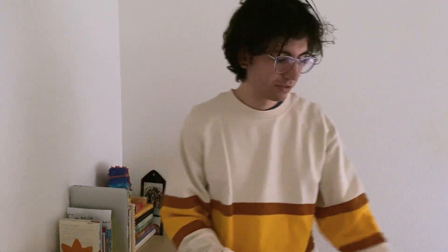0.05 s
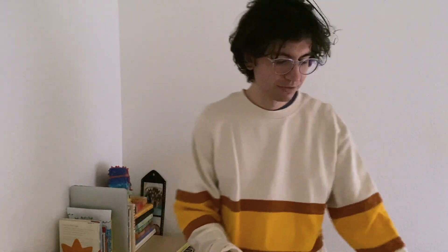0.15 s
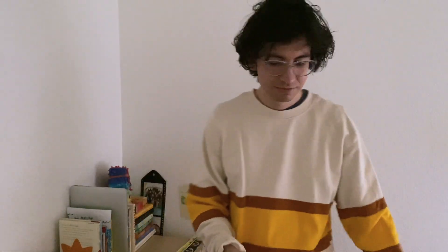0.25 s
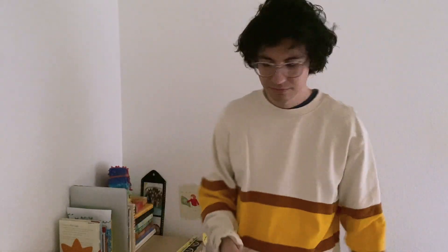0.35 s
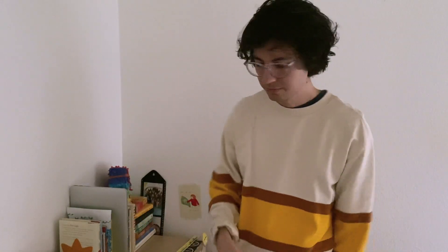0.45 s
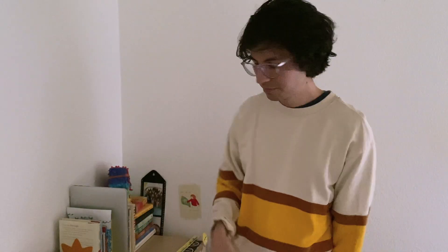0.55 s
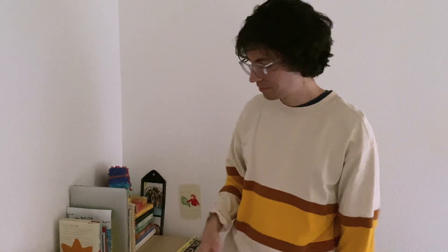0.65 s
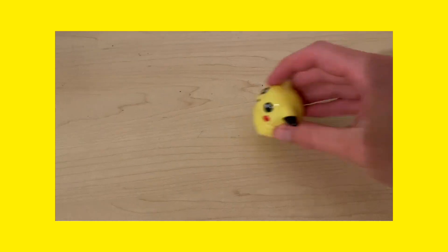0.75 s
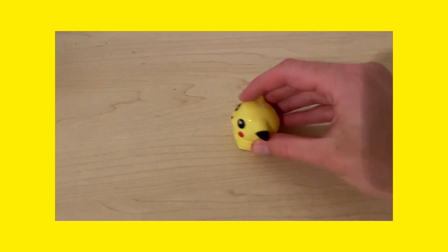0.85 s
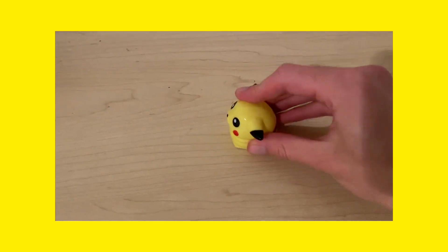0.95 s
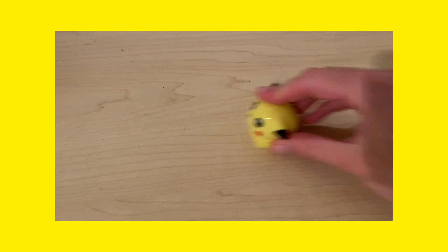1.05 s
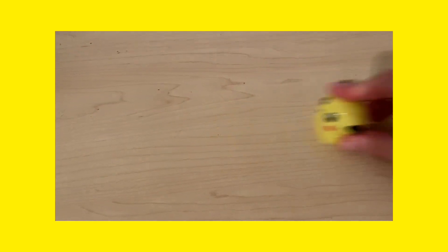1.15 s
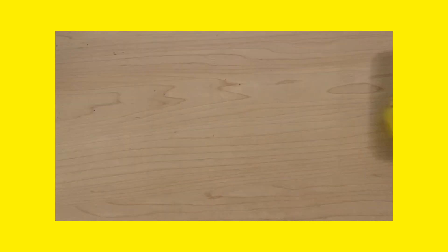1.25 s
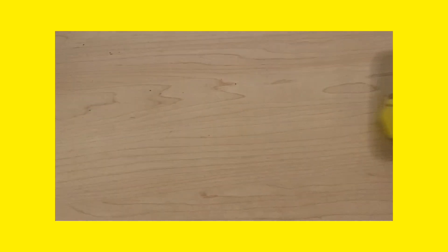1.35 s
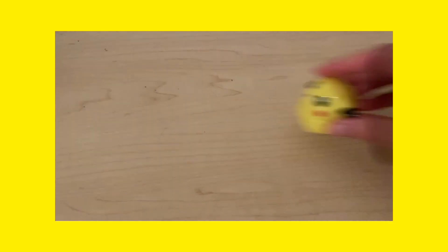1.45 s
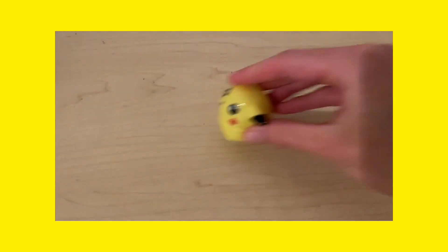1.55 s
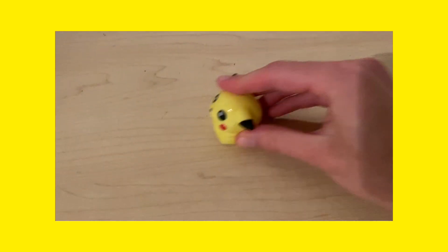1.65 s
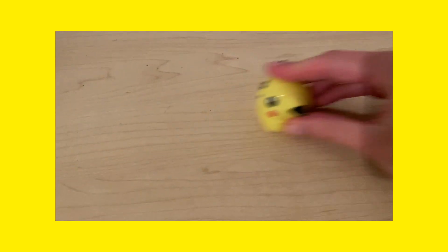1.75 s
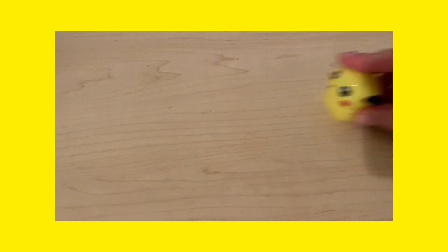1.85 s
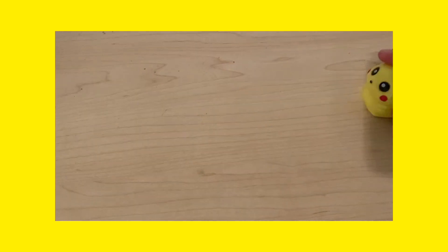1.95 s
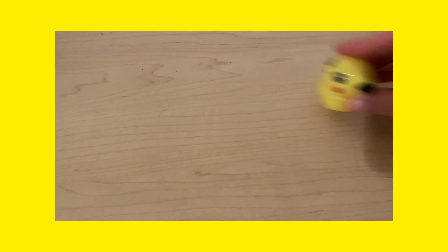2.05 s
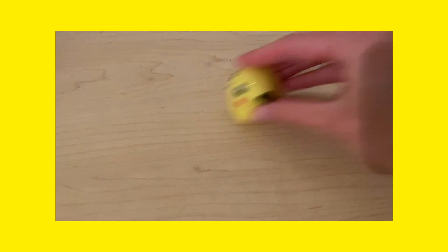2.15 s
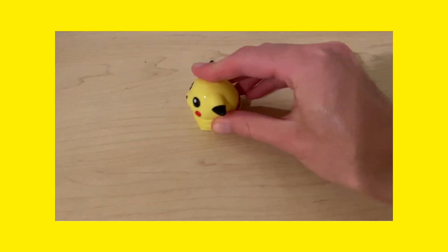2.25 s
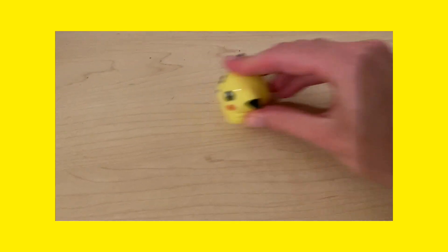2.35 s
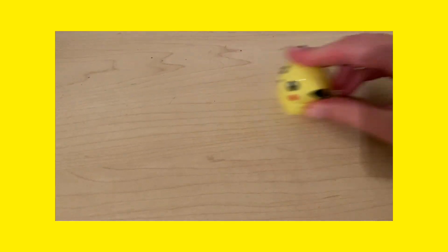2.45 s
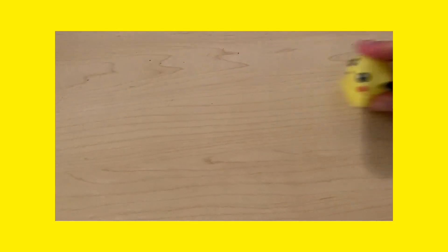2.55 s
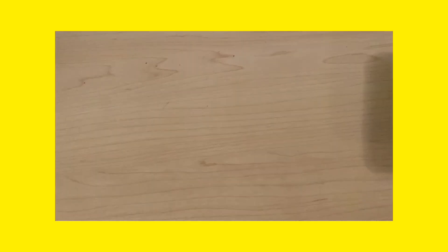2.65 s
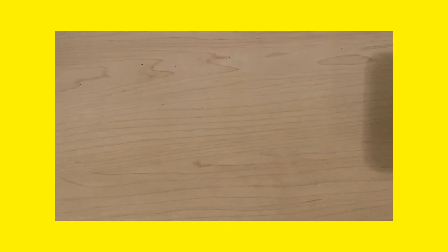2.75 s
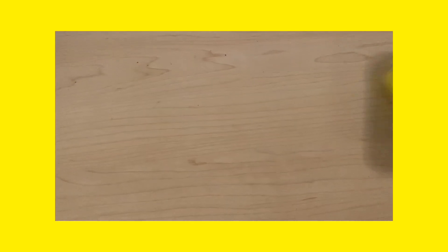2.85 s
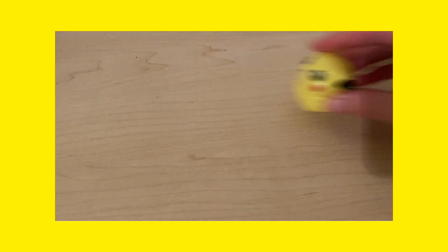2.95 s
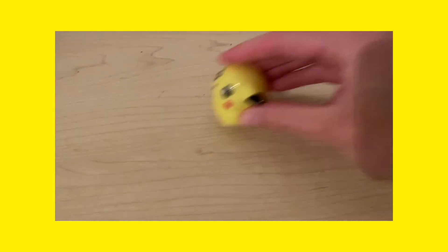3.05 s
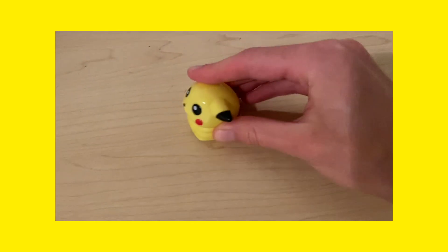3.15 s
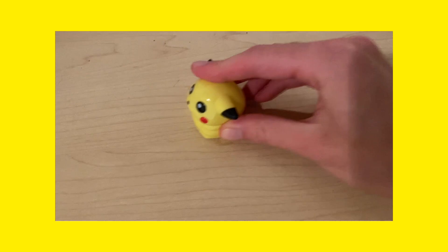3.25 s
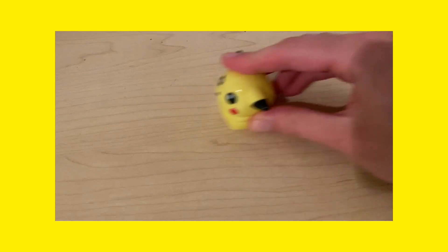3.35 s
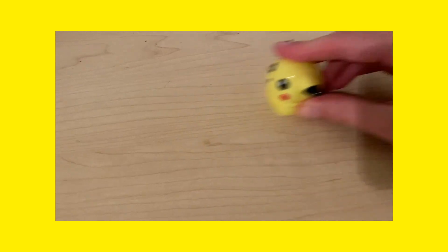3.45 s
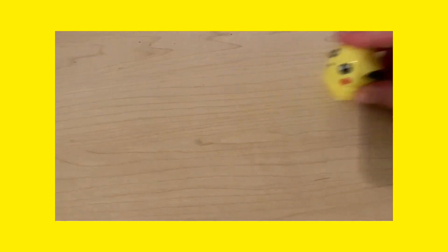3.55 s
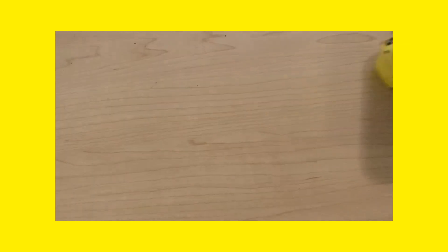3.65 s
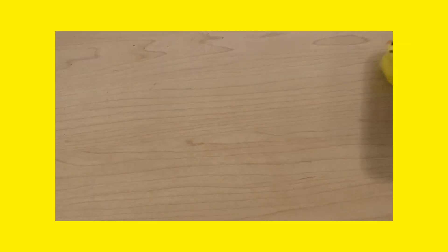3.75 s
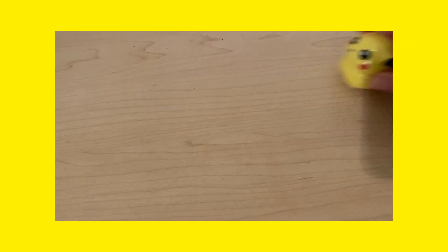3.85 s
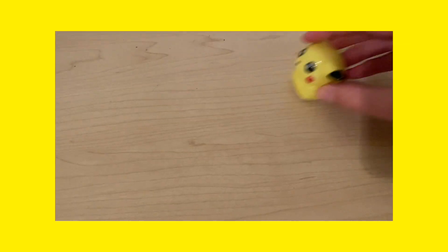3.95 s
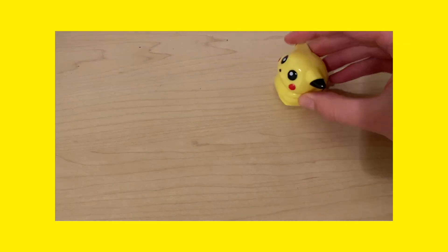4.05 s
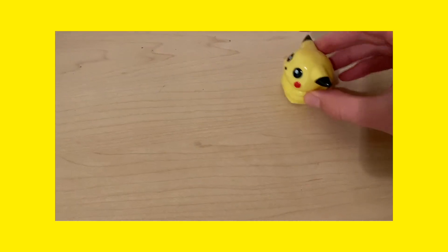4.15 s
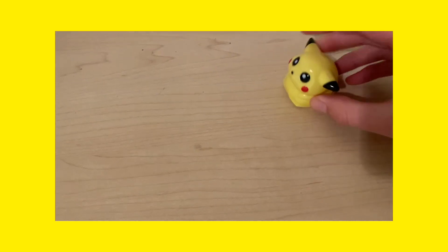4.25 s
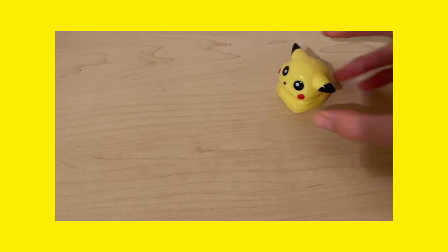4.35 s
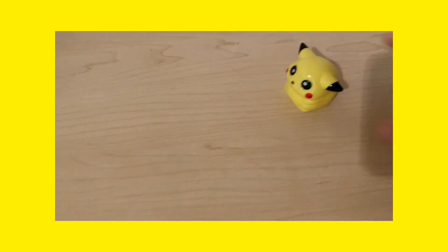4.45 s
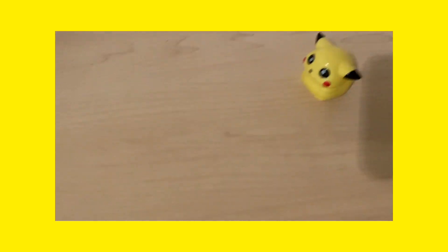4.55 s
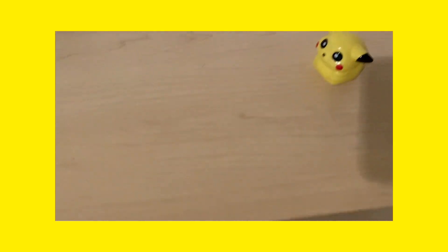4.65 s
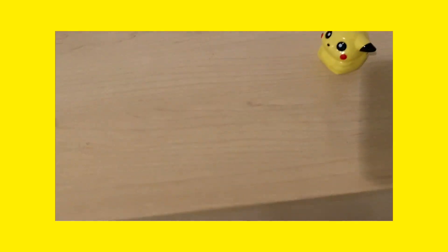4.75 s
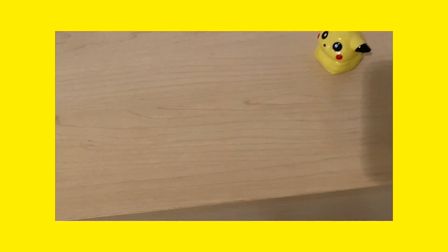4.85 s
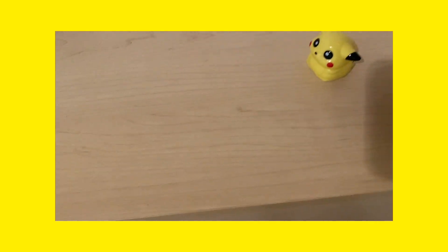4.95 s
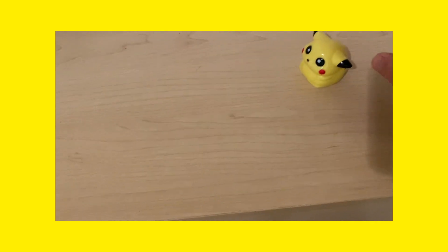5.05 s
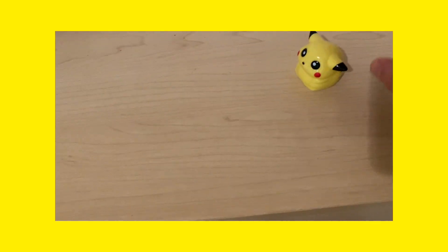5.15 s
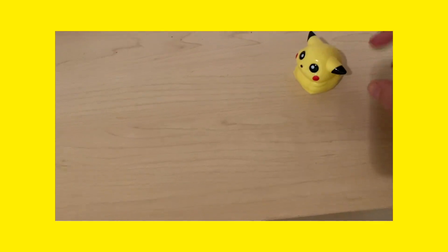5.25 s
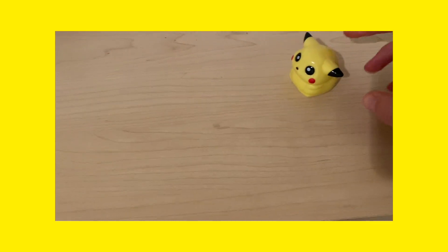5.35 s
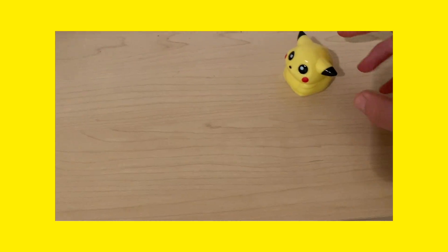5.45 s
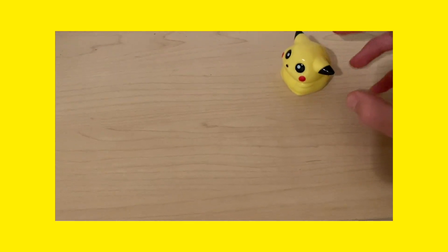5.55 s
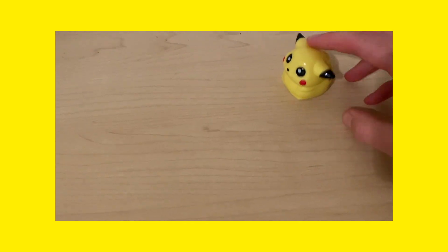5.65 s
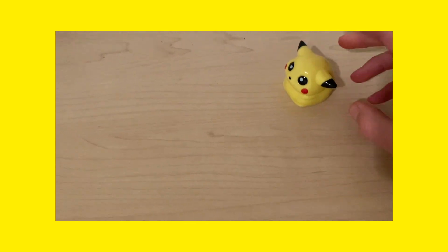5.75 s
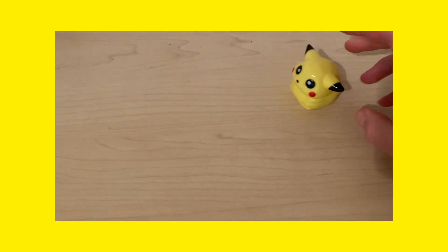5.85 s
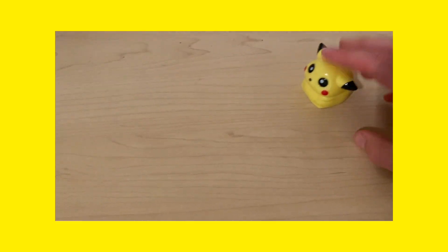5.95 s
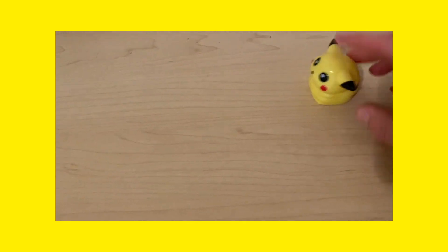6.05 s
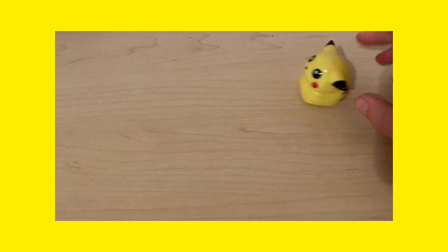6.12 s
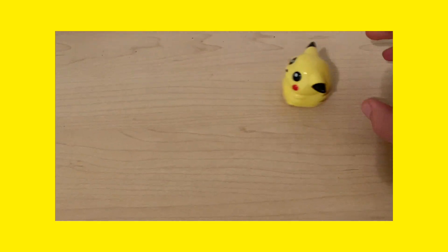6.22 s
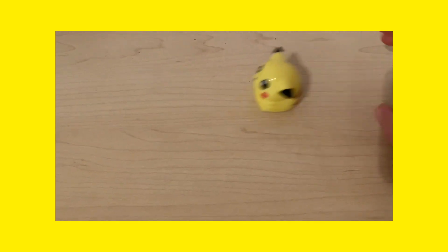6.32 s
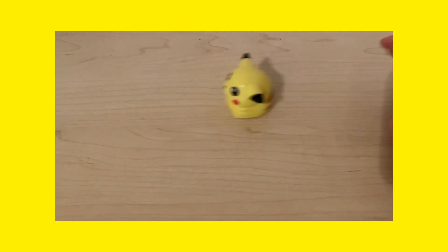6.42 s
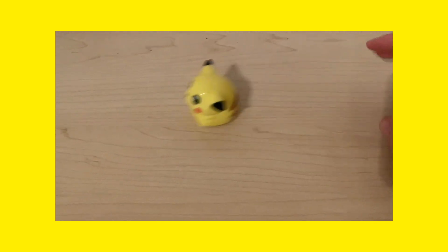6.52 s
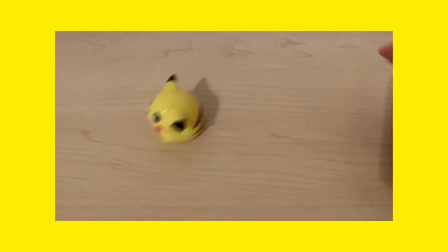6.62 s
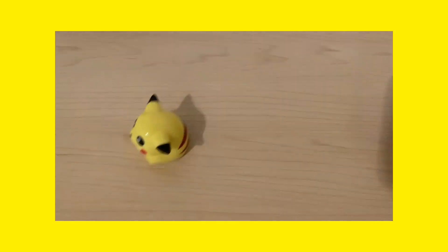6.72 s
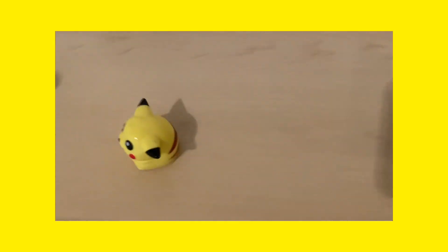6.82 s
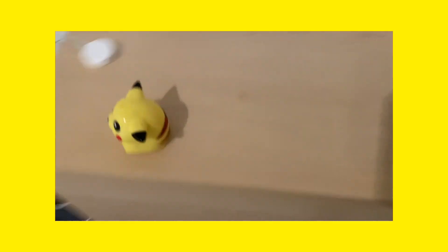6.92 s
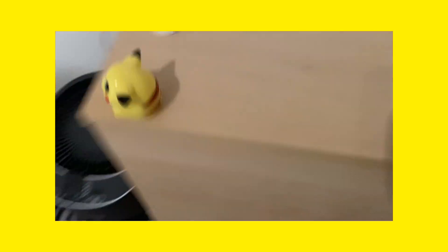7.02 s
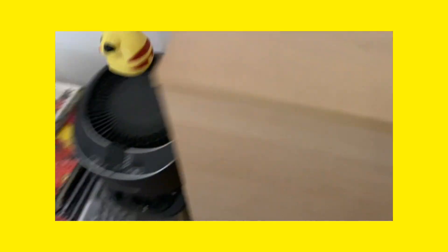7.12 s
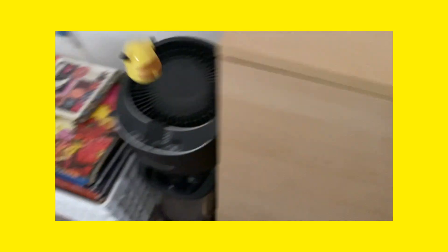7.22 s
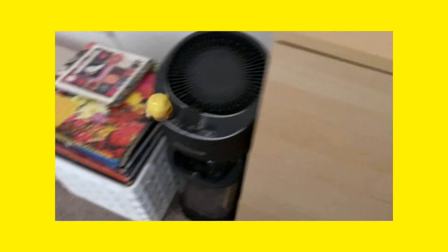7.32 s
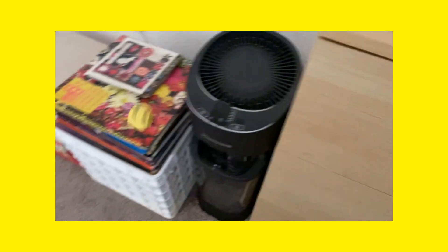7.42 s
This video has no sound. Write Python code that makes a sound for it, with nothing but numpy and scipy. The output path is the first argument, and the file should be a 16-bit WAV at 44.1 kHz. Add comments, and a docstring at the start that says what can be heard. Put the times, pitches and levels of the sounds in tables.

```python
"""Dry plastic buzzes, clicks and rattles in a quiet room: a small pull-back toy is wound on a wooden desk.
Five pulls make its clutch buzz; between them its wheels roll and its ratchet clicks. Set down and nudged,
it hops and rattles across the desk, drops off the edge onto a plastic housing and whirrs on.
Blows ring decaying modes, cracks and rubbing are shaped noise, and the gears and wheels sing rough gliding notes."""
import sys
import numpy as np
from scipy import signal
from scipy.fft import rfft, irfft, next_fast_len
from scipy.io import wavfile

SR = 44100
rng = np.random.default_rng(int(sys.argv[2]) if len(sys.argv) > 2 else 0)


def pcm_store(signal):
    """Save signal as 16-bit PCM."""
    levels = np.round(np.clip(np.atleast_2d(signal), -1, 1) * 32767)
    wavfile.write(sys.argv[1], SR, levels.astype(np.int16).T)


N = 330055
TIME = np.arange(N) / SR

# Noise colours. Each row: frequency in Hz, relative spectral level in dB.
# the room at rest
ROOM_TONE_COLOUR = [(15, -60), (25, -31.5), (36, -11), (62, -6.5), (135, -18), (172, -29.5), (231, -32.5),
                    (257, -21.5), (286, -32.5), (326, -16.5), (373, -28), (450, -36), (543, -20),
                    (655, -41.5), (15000, -64.5)]
# low rumble of handling
RUMBLE_COLOUR = [(18, -36), (30, 4.5), (124, 0.5), (308, -19.5), (344, -33), (393, -13), (639, -38),
                 (714, -62), (1810, -32.5), (6000, -57), (7800, -97), (13200, -120)]
# a hand on the desk
RUSTLE_COLOUR = [(47, -36), (80, -3), (482, -3.5), (587, 2), (715, -7), (1260, -8), (2140, -18.5),
                 (9680, -27), (11300, -32), (12000, -44), (15000, -38)]
# wheels rubbing on the wood
WHEEL_COLOUR = [(30, -25), (55, 0), (130, 2.5), (220, 1), (420, -14.5), (600, -1.5), (950, -4), (1400, -9),
                (3000, -17.5), (7000, -21), (10000, -16), (15000, -24.5)]
# tyres scrubbing under the hand
TYRE_COLOUR = [(300, -22.5), (560, -6), (700, -9), (950, 2.5), (1150, -11.5), (1600, -31.5), (5000, -52)]
# the gear train chattering in its case
GEAR_CASE_COLOUR = [(500, -21), (1000, -9), (1500, -7), (2800, -17), (3400, -6), (3720, -2), (4100, -18),
                    (5500, -5.5), (7300, -18.5), (8500, -9), (15000, -31)]
# the plastic housing under the fall
HOUSING_COLOUR = [(60, -35), (120, -24), (200, -2), (300, -8), (420, -4), (560, -6.5), (680, 1),
                  (1050, -6.5), (1250, -8.5), (1500, -11), (2100, -15), (3300, -18.5), (4200, -29.5),
                  (7000, -22.5), (15000, -31.5)]
# loose gears and legs
RATTLE_COLOUR = [(300, 6), (800, -0.5), (1200, -2), (1700, -3.5), (2700, -14.5), (3700, 0), (4100, 2.5),
                 (4500, 5.5), (6200, 2.5), (7300, 6.5), (8000, -2), (10000, 2), (15000, -5)]
# the crack of a landing
CRACK_COLOUR = [(100, -35), (400, -13.5), (1100, 7), (2200, -8.5), (3200, -4.5), (4500, -19), (9000, -20.5),
                (15000, -25.5)]
# the pawl dropping off a tooth
PAWL_COLOUR = [(200, -27.5), (400, -14.5), (800, -16), (1300, -1.5), (2100, 0), (2900, -10.5), (4300, -4),
               (6200, -4), (7400, -3.5), (10000, 0.5), (12000, 0.5), (15000, -2)]
# bright gear chatter around each clutch thump
SNAP_COLOUR = [(200, -38.5), (700, -16.5), (1500, -4), (2200, -12), (3500, -1), (5000, -5), (7000, -3.5),
               (10000, -1.5), (15000, -6)]

# Ringing bodies. Each row: frequency in Hz, relative level in dB, 60 dB decay time in seconds.
# the desk top bending under a blow
THUMP_MODES = [(51.7, -6, 0.95), (80, -2, 0.18), (122, -5, 0.17), (159, -2.5, 0.086), (231.9, -1.5, 0.11),
               (355, -10, 0.022)]
# toy and desk ringing together (each blow detunes them a little)
DESK_MODES = [(561.4, -14, 0.094), (683, -6, 0.024), (831, -14, 0.064), (932, -6, 0.018), (1076, -2, 0.033),
              (1185.5, -8.5, .04), (1306, -16, 0.042), (1620, -14.5, 0.0025)]
# the plastic shell and gear case
SHELL_MODES = [(1300, -2.5, .035), (2030, -9, .035), (2800, -3.5, .03), (3380, 2, .024), (3690, -6, .05),
               (4230, -6, .012), (7150, -3, .02), (9400, -7.5, .03)]
SHELL_SCATTER_DB = 3.0

# The room's ring. Each row: frequency in Hz, 60 dB decay time in seconds.
ROOM_DECAY = [(100, 0.64), (500, 0.13), (1200, 0.33), (4000, 0.28), (9000, 0.34), (15000, 0.12)]
# Strength of the reflections. Each row: frequency in Hz, level in dB.
ROOM_LEVEL = [(100, -9.5), (500, -4.5), (1200, -13.5), (4000, -12), (7000, -9), (10000, -20),
              (15000, -17.5)]
# Left-right likeness of the reflections. Each row: frequency in Hz, likeness from 0 to 1.
ROOM_LIKENESS = [(100, 0.6), (400, 0.3), (1500, 1), (6000, 0.7), (8500, 1), (15000, 0.96)]
# Treble peaks and dips. Each row: frequency in Hz, width in Hz, boost or cut in dB.
TREBLE_RIPPLES = [(7375, 230, 6), (9800, 1100, 3), (12100, 1300, -2), (15050, 1400, 9.5)]
CUTOFF_HZ = 15850

# A hand brushing over the desk. Each row: start in seconds, level in dB, rise in seconds,
# 60 dB decay time in seconds.
BRUSHES = [(0, -62, 0.0017, 0.19), (0.335, -55, 0.0075, 0.63), (0.48, -42.5, 0.0037, 0.25),
           (0.512, -35, 0.014, .36), (4.44, -62, 0.065, 1)]
# Rumble of handling. Each row: start in seconds, level in dB, rise in seconds, 60 dB decay time in seconds.
NUDGES = [(0, -44.5, 0.0034, 1.45), (0.33, -50, 0.023, 3.3), (5.6, -43.5, .1, 0.34),
          (6.0, -40, 0.0089, 1.5)]
AIR_DB = -60
DIP_S, DIP_DB, DIP_RECOVERY_S = 0.732, -40, 0.33  # recovery is a time constant

# The fall onto the housing. Each row: time in seconds, level in dB before the fall's trim.
FALLS = [(7.354, -6)]

# Pushes forwards, the wheels rolling on the wood. Each row: start in seconds, end in seconds,
# level in dB at full speed, before each layer's trim.
PUSHES = [(1.009, 1.388, -53), (1.649, 2.036, -49), (2.302, 2.862, -46), (3.318, 3.818, -42)]
HUM_SLOW_HZ, HUM_FAST_HZ = 105.37, 184.8
# Wheels and gears while the toy runs free. Each row: time in seconds, wheel level in dB before trims,
# whine pitch in Hz, whine level in dB before trims.
FREE_RUN = [(6.018, -89, 1165, -100), (6.102, -42, 1227, -36), (6.28, -54.5, 1150, -45),
            (6.699, -56, 1131, -44), (7.1, -50, 1023, -41), (7.14, -46.5, 1363, -56),
            (7.2, -73, 1402, -55.5), (7.338, -83, 1347, -78), (7.39, -36, 1450, -31.5),
            (7.48, -59, 1475, -40)]
# The gears spin up briefly as the wheels leave the desk. Each row: start in seconds, pitch in Hz,
# level in dB before trims.
SPIN_UPS = [(3.833, 1192, -39.5), (7.13, 1317, -29)]

# The spring unwinding across the desk. Each row: time in seconds, turns of the hopping cam per second,
# rattle level in dB before trims.
DESK_RUN = [(6.4157, 11.6, -28), (6.55, 11.9, -24.5), (6.72, 13.9, -24.5), (6.86, 19.2, -24),
            (7.135, 24.5, -26)]
# The spring unwinding after the fall. Each row: time in seconds, turns of the hopping cam per second,
# rattle level in dB before trims.
FALLEN_RUN = [(7.386, 37.9, -28), (7.421, 43.8, -19.5), (7.48, 50.9, -18)]
SECOND_CLACK_TURNS, SECOND_CLACK_DB, CLACK_SCATTER_DB = 0.256, 2.5, 3.2  # the cam clacks twice a turn
FIRST_CLACK_T60_S, SECOND_CLACK_T60_S = 0.022, 0.027

# The toy lands on the desk and rocks twice. Each row: time in seconds, knock level in dB before trims,
# crack in dB relative to the knock, desk thump in dB before its trim, seconds to the first rebound,
# dB lost per rebound.
LANDINGS = [(0.879, -34, -3, -54.5, 0.017, 16), (1.008, -46.5, -17, -71, .014, 20),
            (1.623, -17.5, -3, -40, 0.016, 21), (2.204, -31, -18, -39.5, 0.019, 0),
            (3.121, -14, -1, -39, 0.013, 22), (4.017, -38.5, -10.5, -50, 0.0077, 21),
            (4.216, -22.5, -13.5, -40.5, 0.016, 18), (4.355, -21, 5, -37, .015, 8.5),
            (4.423, -25.5, -22, -47, 0.0096, 10), (5.677, -31.5, -15, -41, 0.012, 0),
            (5.73, -40, -5.5, -49.5, .013, -0.5), (6.003, -31.5, -22.5, -39.5, 0.011, 14),
            (6.084, -21, -6.5, -42, 0.015, 1), (6.142, -23, -12, -35.5, 0.026, 5),
            (6.198, -10.5, -17, -33.5, 0.019, 6.5), (6.265, -20.5, -15, -44, 0.0097, 17),
            (6.37, -13, -19, -32.5, .023, 6.5), (6.513, -17.5, -23, -41, .014, 19),
            (6.598, -19.5, -33, -42.5, 0.0061, 20), (6.658, -30, -8, -67, 0.014, 5),
            (6.746, -24.5, -7.5, -42, 0.012, 11), (6.806, -26.5, 0.5, -41.5, 0.0081, 4.5),
            (6.886, -23, -5.5, -38, 0.012, 10), (6.918, -17.5, -14, -35.5, 0.011, 14),
            (6.994, -19, -18, -62, 0.013, 3.5), (7.101, -27.5, -8, -51, 0.022, 16)]
REBOUND_SHRINK = 0.74  # the second rebound comes sooner than the first

# The ratchet running during a push. Each row: start in seconds, number of clicks, first tooth,
# mean seconds per tooth before braking, share the last gap is longer by, level in dB before trims,
# growth over the run in dB.
RATCHET_RUNS = [(1.2486, 3, 0, 0.0153, .59, -22, -1), (1.8435, 5, 3, 0.0219, .39, -17.5, 0),
                (2.4707, 12, 0, 0.0235, .516, -12.5, 1.5), (3.5018, 9, 0, 0.0242, .478, -8, 1)]
# The ratchet wheel's four unevenly spaced teeth. Each entry: gap relative to the mean.
TOOTH_GAPS = [0.814, 1.018, 1.032, 1.136]
BRAKING_TEETH = 0.626  # how far back from the last gap the slowing reaches
# Single clicks as the toy is gripped or jolted, and the first few clacks of the cam as the toy starts to run #
# near 6.2 s. Each row: time in seconds, level in dB before trims, shell ring in dB relative to the click, #
# before its trim.
LONE_CLICKS = [(1.3865, -33, -16), (2.786, -31, -28), (2.8506, -27, -15), (2.9002, -27, -11),
               (2.9127, -25.5, -1), (3.324, -27, -20), (3.3574, -34, -29.5), (3.4042, -32, -22),
               (3.8405, -21.5, -9), (4.0208, -22.5, -12.5), (4.0863, -27.5, -8.5), (4.342, -40, 4),
               (4.434, -40.5, -4), (5.672, -38.5, -8), (6.0025, -23.5, -10), (6.113, -6.5, -23),
               (6.164, -20, -9), (6.199, -17, -22), (6.2284, -11, -11), (6.251, -22.5, -18),
               (6.343, -34, -7), (6.37, -17.5, -16)]
PAWL_SHELL_DB, PAWL_SCATTER_DB, PAWL_SHELL_SCATTER_DB, PAWL_PAN_SCATTER_DB = -11, 0.45, 3.0, 3

# Pulls backwards, the clutch slipping tooth by tooth. Each row: start in seconds, number of teeth,
# seconds per tooth, ring level in dB before trims, central ring pitch in Hz, snap level in dB before trims,
# growth over the pull in dB.
PULLS = [(0.7487, 7, 0.0196, -42.5, 1390, -48.5, 12), (1.4128, 12, 0.0181, -21.5, 1355, -28.5, -2),
         (2.0596, 9, 0.0181, -17, 1340, -25.5, -1), (2.93, 11, 0.0187, -15.5, 1360, -20.5, 2.5),
         (4.1003, 6, 0.0195, -11, 1240, -18, 0)]
# Every pull swells and rises slightly in pitch, then weakens and drops at its end.
# Each row: share of the pull from 0 to 1, ring change in dB, snap change in dB, pitch ratio.
PULL_SHAPE = [(0, -2, -1.5, .95), (.2, .5, 0, 1), (.6, 0, 0, 1.01), (.85, -2.5, 0, .99), (1, -8, -2.5, .88)]
TOOTH_SCATTER_DB, TOOTH_SCATTER_PITCH, TOOTH_JITTER_S = 1.32, 0.017, 0.0005

LEFT_RIGHT = np.array([[1], [-1]])  # opposite signs for the two ears


def from_db(db):
    """Amplitude factor for a level in dB."""
    return 10 ** (np.asarray(db) / 20)


def rms_one(x):
    """Scales a signal to rms 1."""
    return x / np.sqrt(np.mean(x ** 2) + 1e-20)


def at_hz(points, hz):
    """Reads a table on a log-frequency axis."""
    f, value = np.transpose(points)
    return np.interp(np.log(np.maximum(hz, 1)), np.log(f), value)


def level(curve):
    """Gain over time from rows of (s, dB)."""
    return from_db(np.interp(TIME, *np.transpose(curve)))


def pan(db):
    """Left and right gains for a level difference; positive leans left."""
    return from_db(db * LEFT_RIGHT / 2)


def add(track, s, sound):
    """Mixes a sound into a track at a time."""
    start = int(np.clip(round(s * SR), 0, N - 1))
    track[..., start:start + sound.shape[-1]] += sound[..., :N - start]


def swell(rise, t60):
    """Envelope of one contact: builds up, then dies away; top 1."""
    t = np.arange(int((rise + t60) * SR) + 2) / SR
    shape = (1 - np.exp(-(t / rise) ** 2)) * from_db(-60 * t / t60)
    return shape / shape.max()


def swells(rows):
    """Gain over time from rows of (s, dB, rise s, t60 s)."""
    gain = np.zeros(N)
    for s, db, rise, t60 in rows:
        add(gain, s, from_db(db) * swell(rise, t60))
    return gain


def colour(x, spectrum, size=4096):
    """Causal (minimum-phase) filter with the given spectrum and unit power gain."""
    log_gain = np.log(from_db(at_hz(spectrum, np.fft.rfftfreq(size, 1 / SR))))
    cepstrum = irfft(log_gain)
    # folding the cepstrum forwards packs the energy at the start
    cepstrum[1:size // 2] *= 2
    cepstrum[size // 2 + 1:] = 0
    response = irfft(np.exp(rfft(cepstrum)))
    response = response / np.linalg.norm(response)
    return signal.oaconvolve(x, response[None], axes=1)[:, :N]


def stereo_noise(apart_above_hz=1300, apart_below_hz=7000):
    """White noise that differs between the ears mostly in the middle of the range."""
    mid, side = rng.standard_normal((2, N))
    band = signal.butter(1, [apart_above_hz, apart_below_hz], "band", fs=SR)
    side = signal.lfilter(*band, side)
    return (mid + side * LEFT_RIGHT) / np.sqrt(2)


def friction(gain, spectrum, grain_db, grain_hz):
    """Rubbing surfaces catch and let go, so their noise comes in grains."""
    knots = rng.standard_normal(N // 10)
    grains = from_db(grain_db * np.interp(TIME * grain_hz, np.arange(len(knots)), knots))
    return gain * colour(rms_one(grains) * stereo_noise(), spectrum)


def rough_note(s, hz, width_hz, unsteady, ears_apart=0.95):
    """A gliding tone whose strength and phase wobble; rms 1."""
    slow = signal.butter(2, width_hz, fs=SR, output="sos")
    in_step, out_of_step = rms_one(signal.sosfilt(slow, rng.standard_normal((2, N))))
    phase = 2 * np.pi * np.cumsum(np.interp(TIME, s, hz)) / SR + ears_apart * LEFT_RIGHT
    return rms_one((1 + unsteady * in_step) * np.sin(phase) + unsteady * out_of_step * np.cos(phase))


def strike(times, db, modes, scatter_db, ears_apart, detune=0):
    """Every blow excites each mode with its own strength and slight detuning, a little apart in the ears."""
    out, starts = np.zeros((2, N)), np.round(times * SR).astype(int)
    chance = rng.standard_normal(size=(len(times), len(modes), 3))
    for k, (hz, mode_db, t60) in enumerate(modes):
        t = np.arange(int(max(t60, 0.002) * SR)) / SR
        decay = from_db(-60 * t / t60) * (-1) ** k  # neighbouring modes start in opposite directions
        for start, blow_db, (strength, skew, shift) in zip(starts / SR, db, chance[:, k]):
            # the ears drift apart over the first cycle
            apart = ears_apart * skew * LEFT_RIGHT * np.minimum(t * hz, 1)
            phase = 2 * np.pi * hz * (1 + detune * shift) * t + apart
            add(out, start, from_db(blow_db + mode_db + scatter_db * strength) * decay * np.sin(phase))
    return out


def room_tone():
    """Steady, mostly low noise of the quiet room."""
    return from_db(AIR_DB) * colour(stereo_noise(), ROOM_TONE_COLOUR)


def hand_noise():
    """The hand brushes over the desk in fine grains and its handling rumbles in coarse ones."""
    rustle = friction(swells(BRUSHES), RUSTLE_COLOUR, grain_db=1.0, grain_hz=318)
    rumble = friction(swells(NUDGES), RUMBLE_COLOUR, grain_db=2.1, grain_hz=30)
    return rustle + rumble


def background_dip():
    """Gain of the background, which drops out at once and creeps back."""
    recovery = np.exp(-np.abs(TIME - DIP_S) / DIP_RECOVERY_S)
    return from_db(DIP_DB * (TIME > DIP_S) * recovery)


def room(x, first_echo=0.012, build_up=0.0039, count=12, size=30000):
    """Diffuse reflections of the mono sum, dying band by band; times in seconds."""
    t, hz = np.arange(size) / SR, np.fft.rfftfreq(size, 1 / SR)
    mid, side = rfft(rng.standard_normal((2, size)))
    alike = np.clip(at_hz(ROOM_LIKENESS, hz), -1, 1)
    white = (np.sqrt(1 + alike) * mid + np.sqrt(1 - alike) * side * LEFT_RIGHT) / np.sqrt(2)
    onset = np.clip((t - first_echo) / build_up, 0, 1)
    centres, response = np.geomspace(100, CUTOFF_HZ, count), 0
    for centre, share in zip(centres, np.eye(count)):
        decay = onset * from_db(-60 * t / at_hz(ROOM_DECAY, centre))
        band = irfft(white * at_hz(np.c_[centres, share], hz))  # triangular, overlapping its neighbours
        response = response + band * decay / np.linalg.norm(decay) * from_db(at_hz(ROOM_LEVEL, centre))
    return signal.oaconvolve(x.mean(axis=0)[None], response, axes=1)[:, :N]


def fall(gain_db=-6.0):
    """The hollow housing answers the drop with a short burst of low, uneven noise."""
    blow = swells([(s, db + gain_db, 0.00097, 0.13) for s, db in FALLS])
    return colour(blow * stereo_noise(), HOUSING_COLOUR)


def wheels(hum_db=-12.5, mesh_db=-18.5, mesh_ratio=5.5, rub_db=0.0, loudness_power=1.19,
           tyres_db=-0.5, gears_db=2.0):
    """Wheels rub and hum on wood, louder and higher as a push speeds up; tyres scrub, free gears chatter."""
    s, db, _, _ = np.transpose(FREE_RUN)
    running = (TIME > s[0]) * 1.0
    speed, free, pushed = running, running * level(np.c_[s, db]), 0
    for start, end, push_db in PUSHES:
        arch = np.abs(np.sin(np.pi * np.clip((TIME - start) / (end - start), 0, 1)))
        speed = speed + arch
        pushed = pushed + from_db(push_db) * arch ** loudness_power
    hz = HUM_SLOW_HZ + (HUM_FAST_HZ - HUM_SLOW_HZ) * speed
    hum = from_db(hum_db) * rough_note(TIME, hz, width_hz=75, unsteady=1.0)
    mesh = from_db(mesh_db) * rough_note(TIME, hz * mesh_ratio, width_hz=86, unsteady=1.3)
    rub = from_db(rub_db) * friction(free + pushed, WHEEL_COLOUR, grain_db=3.0, grain_hz=252.6)
    scrub = from_db(tyres_db) * friction(pushed, TYRE_COLOUR, grain_db=11.5, grain_hz=26.1)
    gears = from_db(gears_db) * friction(free, GEAR_CASE_COLOUR, grain_db=5.0, grain_hz=307)
    return (free + pushed) * (hum + mesh) + rub + scrub + gears


def whine(run_db=-0.5, pull_db=-24.5, lead_s=0.049, tail_s=0.025, fade_db=28, slow_ratio=0.95,
          spin_rise=0.0057, spin_t60=0.017, pan_db=2.0):
    """Meshing teeth sing a rough note at the speed of the gears: in the free run, pulls and spin-ups."""
    s, _, hz, db = np.transpose(FREE_RUN)
    running = level(np.c_[s, db + run_db]) * rough_note(s, hz, width_hz=65, unsteady=4.0)

    gain, pitch = np.zeros(N), []
    for start, count, period, ring_db, hz, _, _ in PULLS:
        end = start + (count - 1) * period
        s = [start - lead_s, start, end, end + tail_s]
        # silent outside the pull, faded at both ends
        fade = np.interp(TIME, s, [-fade_db, 0, 0, -fade_db], left=-np.inf, right=-np.inf)
        gain += from_db(ring_db + pull_db + fade)
        pitch += zip(s, hz * np.array([slow_ratio, 1, 1, slow_ratio]))
    pulled = gain * rough_note(*np.transpose(pitch), width_hz=180, unsteady=3.3)

    s, hz, _ = np.transpose(SPIN_UPS)
    bursts = swells([(at, db + run_db, spin_rise, spin_t60) for at, _, db in SPIN_UPS])
    spinning = bursts * rough_note(s, hz, width_hz=32, unsteady=3.0)
    return pan(pan_db) * (running + pulled + spinning)


def cam_clacks():
    """Two clacks for every turn of the cam: (s, dB before trims, t60 s)."""
    clacks = []
    pair = ((0, 0, FIRST_CLACK_T60_S), (SECOND_CLACK_TURNS, SECOND_CLACK_DB, SECOND_CLACK_T60_S))
    for run in (DESK_RUN, FALLEN_RUN):
        s, rate, db = np.transpose(run)
        t = np.arange(s[0], s[-1], 1 / SR)
        turns = np.cumsum(np.interp(t, s, rate)) / SR
        for offset, extra_db, t60 in pair:
            for at in np.interp(np.arange(offset, turns[-1]), turns, t):
                scatter_db = CLACK_SCATTER_DB * rng.standard_normal()
                clacks.append((at, np.interp(at, s, db) + extra_db + scatter_db, t60))
    return clacks


def rattle(gain_db=-7.5, shell_db=-23.0, pan_db=2.0, rise=0.0025):
    """Loose gears and legs clatter in short bursts while the spring runs down, ringing the shell."""
    clacks = cam_clacks()
    bursts = swells([(s, db + gain_db, rise, t60) for s, db, t60 in clacks])
    s, db, _ = np.transpose(clacks)
    shell = strike(s, db + shell_db, SHELL_MODES, SHELL_SCATTER_DB, ears_apart=0.94)
    return pan(pan_db) * (colour(bursts * stereo_noise(), RATTLE_COLOUR) + shell)


def rebounds():
    """Each landing and its two rebounds: (s, dB before trims, crack dB relative to it)."""
    blows = []
    for s, db, crack_db, _, gap, loss_db in LANDINGS:
        for k, delay in enumerate((0, 1, 1 + REBOUND_SHRINK)):
            blows.append((s + gap * delay, db - loss_db * k, crack_db))
    return blows


def knocks(body_db=-2.0, thump_db=-0.5, crack_db=-4.5, shell_db=-14.5, pan_db=2.0):
    """Every blow rings toy and desk, cracks and rings the shell; each landing also bends the desk top."""
    s, db, crack_rel_db = np.transpose(rebounds())
    body = strike(s, db + body_db, DESK_MODES, scatter_db=3.5, ears_apart=0.44, detune=0.02)
    shell = strike(s, db + crack_rel_db + shell_db, SHELL_MODES[:5], SHELL_SCATTER_DB,
                   ears_apart=0.73, detune=0.016)
    landed, _, _, low_db, _, _ = np.transpose(LANDINGS)
    thump = strike(landed, low_db + thump_db, THUMP_MODES, scatter_db=1.0, ears_apart=0.1)
    bursts = swells([(at, blow_db, 0.0022, 0.029) for at, blow_db in zip(s, db + crack_rel_db + crack_db)])
    cracks = colour(bursts * stereo_noise(), CRACK_COLOUR)
    return thump + pan(pan_db) * (body + shell + cracks)


def pawl_clicks():
    """The pawl follows uneven teeth and slows as each push ends: (s, dB, relative shell dB, pan dB)."""
    clicks = [(*row, 0) for row in LONE_CLICKS]
    for s, count, first, period, braking, db, growth_db in RATCHET_RUNS:
        k = np.arange(round(count))
        tooth = (k + round(first)) % len(TOOTH_GAPS)
        gaps_to_end = k[:-1][::-1]
        slowing = 1 + braking * np.exp(-gaps_to_end / BRAKING_TEETH)
        gaps = period * np.take(TOOTH_GAPS, tooth[:-1]) * slowing
        times = s + np.r_[0, np.cumsum(gaps)]
        force, ring, side = rng.standard_normal(size=(len(k), 3)).T
        click_db = db + growth_db * (k / k[-1] - 0.5) + PAWL_SCATTER_DB * force
        ring_db = PAWL_SHELL_DB + PAWL_SHELL_SCATTER_DB * ring
        clicks += zip(times, click_db, ring_db, PAWL_PAN_SCATTER_DB * side)
    return clicks


def ratchet(gain_db=-8.0, shell_db=-10.5, shell_delay=0.0012, tint_db=-11.0, tint_hz=2800,
            tint_octaves=0.95, tint_q=4):
    """The pawl drops off a tooth: a dry, bright crack, tinted anew each time, and the shell rings."""
    cracks, tints = np.zeros((2, N)), np.zeros((2, N))
    shape, clicks = swell(rise=0.0008, t60=0.022), pawl_clicks()
    for s, db, _, pan_db in clicks:
        crack = from_db(db + gain_db) * pan(pan_db) * shape
        add(cracks, s, crack)
        centre = tint_hz * 2 ** (tint_octaves * rng.uniform(-0.7, 1))
        peak = signal.iirpeak(centre, tint_q, fs=SR)
        tint = rms_one(signal.lfilter(*peak, rng.standard_normal(SR // 10)))
        add(tints, s, from_db(tint_db) * crack * tint[:len(shape)])
    s, db, shell_rel_db, _ = np.transpose(clicks)
    shell = strike(s + shell_delay, db + shell_rel_db + shell_db, SHELL_MODES, SHELL_SCATTER_DB,
                   ears_apart=0.42, detune=0.03)
    return colour(cracks * stereo_noise(), PAWL_COLOUR) + tints + shell


def pull_teeth():
    """Every slipping tooth of every pull: (s, ring dB, ring Hz, snap dB), levels before trims."""
    teeth, (share, *shape) = [], np.transpose(PULL_SHAPE)
    for s, count, period, ring_db, hz, snap_db, growth_db in PULLS:
        k = np.arange(round(count))
        along = k / k[-1]
        ring, snap, pitch = [np.interp(along, share, column) for column in shape]
        force, detune, late = rng.standard_normal(size=(len(k), 3)).T
        force_db = growth_db * (along - 0.5) + TOOTH_SCATTER_DB * force
        times = s + k * period + TOOTH_JITTER_S * late
        tooth_hz = hz * pitch * (1 + TOOTH_SCATTER_PITCH * detune)
        teeth += zip(times, ring_db + ring + force_db, tooth_hz, snap_db + snap + force_db)
    return teeth


def clutch(ring_db=-1.5, snap_db=-1.0, snap_lead=0.0024, sag=0.084, sag_time=0.0034,
           ears_apart=0.16, pan_db=1.0):
    """Each slipping tooth thumps the hollow shell, whose note sags,
    with a bright gear chatter that starts just ahead of the thump."""
    note, chatter = np.zeros((2, N)), np.zeros(N)
    thump, snap = swell(rise=0.0017, t60=0.013), swell(rise=0.0035, t60=0.043)
    t = np.arange(len(thump)) / SR
    bend = 1 + sag * (2 * np.exp(-t / sag_time) - 1)  # from above the pitch to below it
    for s, db, hz, chatter_db in pull_teeth():
        phase = 2 * np.pi * np.cumsum(hz * bend) / SR + ears_apart * LEFT_RIGHT
        add(note, s, from_db(db + ring_db) * thump * np.sin(phase))
        add(chatter, s - snap_lead, from_db(chatter_db + snap_db) * snap)
    return note * pan(pan_db) + colour(chatter * stereo_noise(), SNAP_COLOUR)


def scene():
    """The toy and its reflections, over a background of hand noise and room tone that dips once."""
    background = background_dip() * (room_tone() + hand_noise())
    toy = fall() + wheels() + whine() + rattle() + knocks() + ratchet() + clutch()
    return background + room(toy) + toy


def record(dry, low_cut_hz=42):
    """Deepest bass and top are cut, the treble ripples; the recorder's stereo processing delays the left treble."""
    dry = signal.sosfilt(signal.butter(4, low_cut_hz, "high", fs=SR, output="sos"), dry)
    for hz, width_hz, db in TREBLE_RIPPLES:
        turn = -2 * np.cos(2 * np.pi * hz / SR)
        a, g = np.tan(np.pi * width_hz / SR), from_db(db / 2)
        dry = signal.lfilter([1 + a * g, turn, 1 - a * g], [1 + a / g, turn, 1 - a / g], dry)
    size = next_fast_len(N + 1000)
    # a phase slope above 6350 Hz delays the left treble by 0.263 ms
    treble = np.maximum(np.fft.rfftfreq(size, 1 / SR) - 6350, 0)
    left = irfft(rfft(dry[0], size) * np.exp(-2j * np.pi * treble * 0.000263), size)[:N]
    top_cut = signal.ellip(10, 0.3, 70, CUTOFF_HZ, fs=SR, output="sos")
    return signal.sosfilt(top_cut, [left, dry[1]])


dry = scene()
out = record(dry)
pcm_store(out)
```